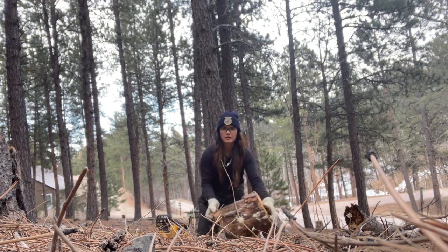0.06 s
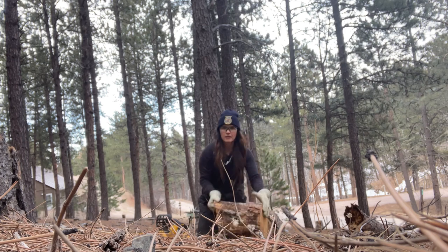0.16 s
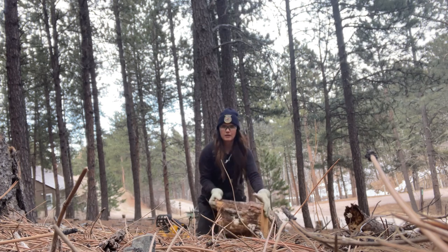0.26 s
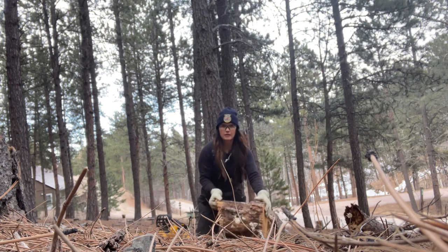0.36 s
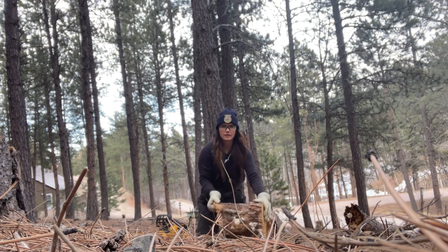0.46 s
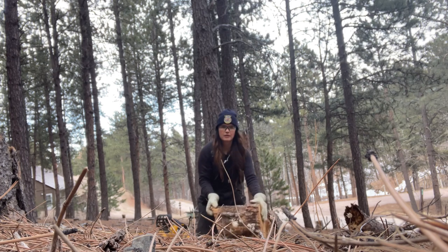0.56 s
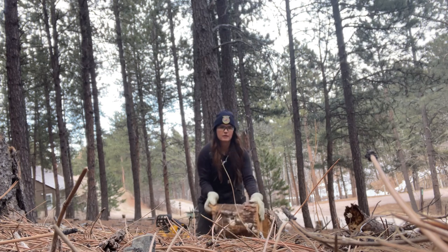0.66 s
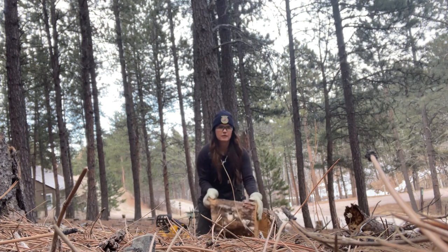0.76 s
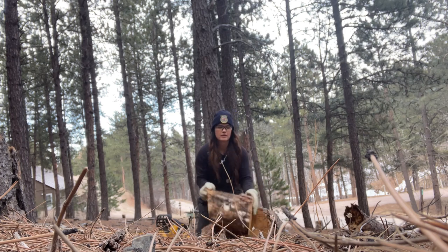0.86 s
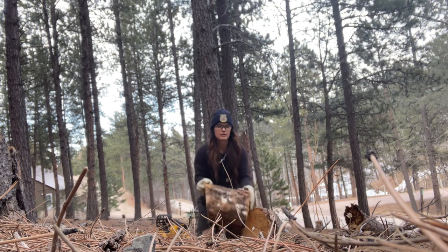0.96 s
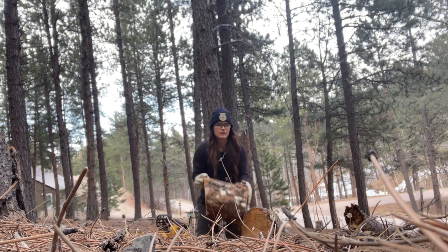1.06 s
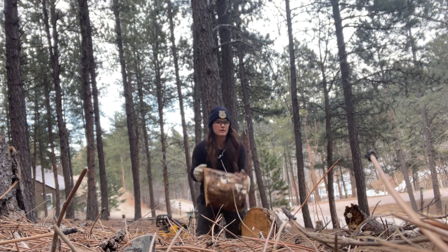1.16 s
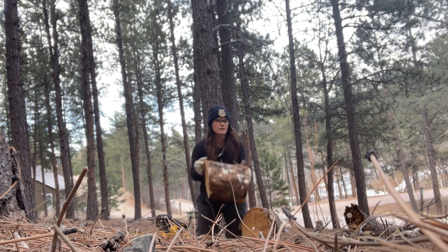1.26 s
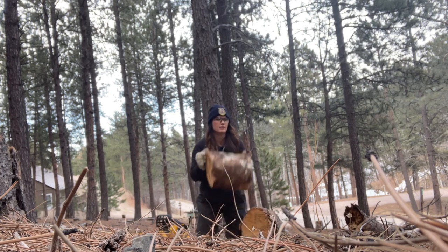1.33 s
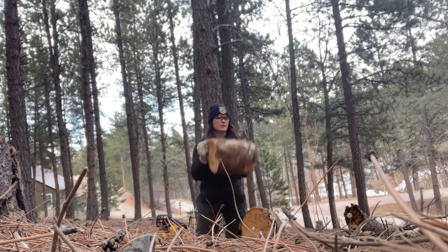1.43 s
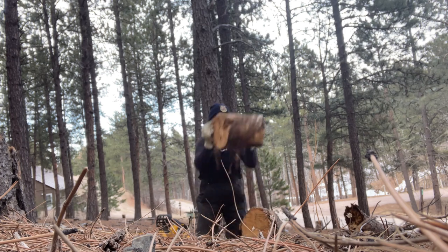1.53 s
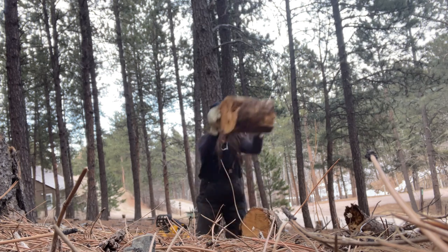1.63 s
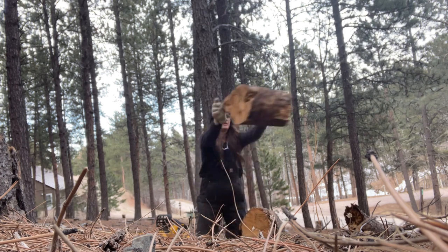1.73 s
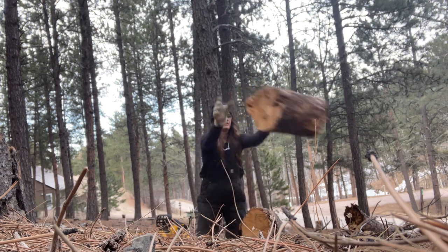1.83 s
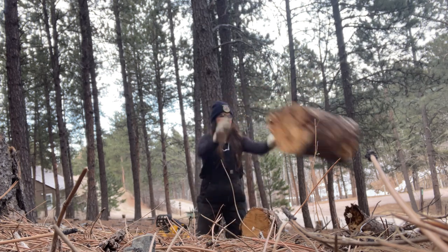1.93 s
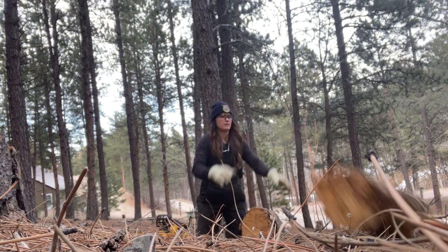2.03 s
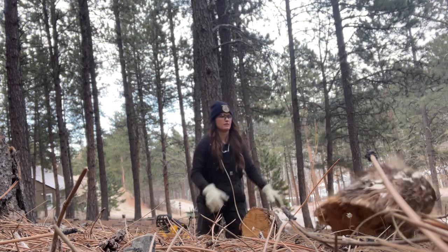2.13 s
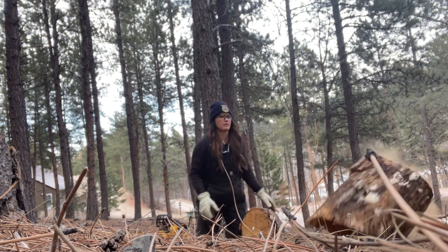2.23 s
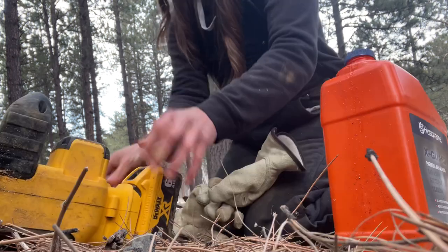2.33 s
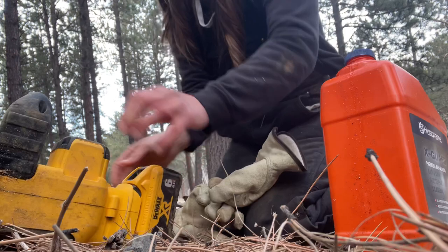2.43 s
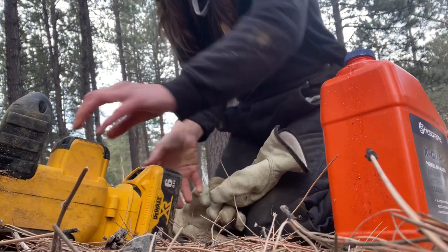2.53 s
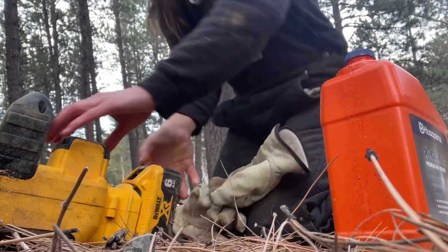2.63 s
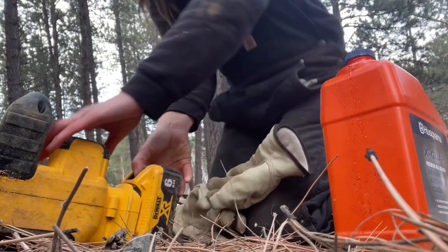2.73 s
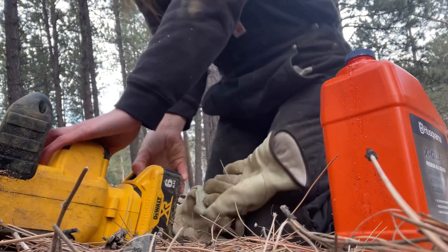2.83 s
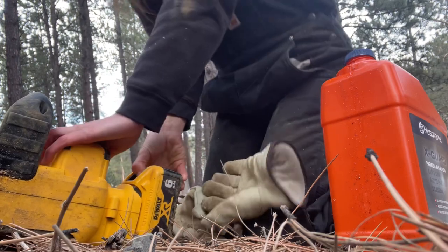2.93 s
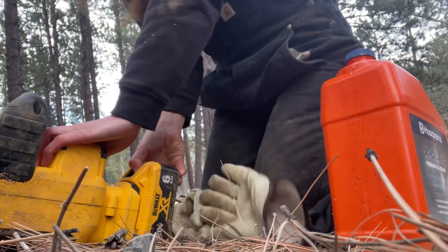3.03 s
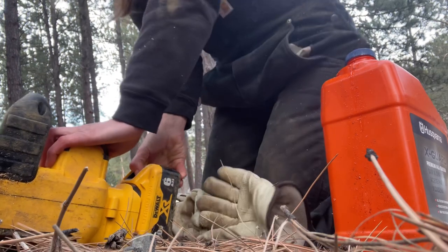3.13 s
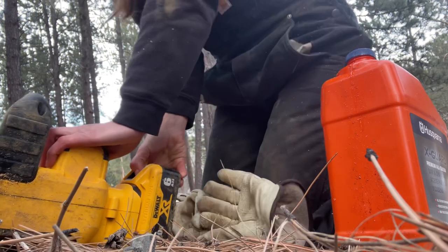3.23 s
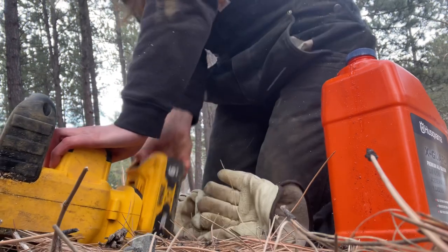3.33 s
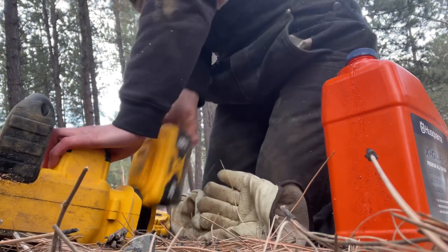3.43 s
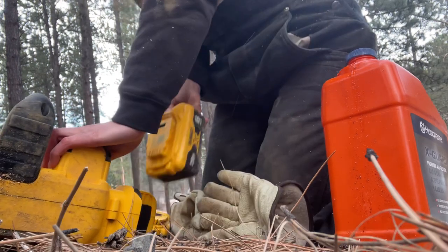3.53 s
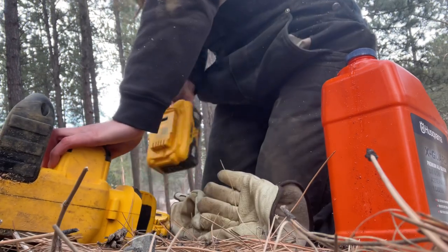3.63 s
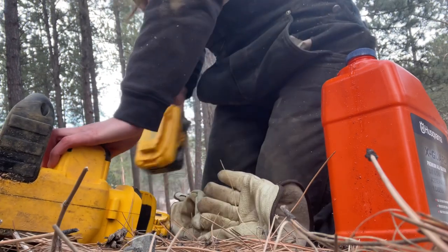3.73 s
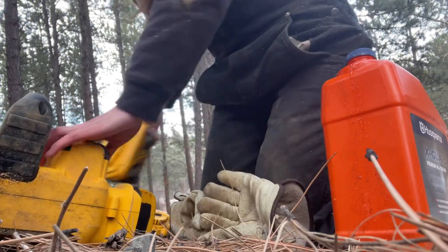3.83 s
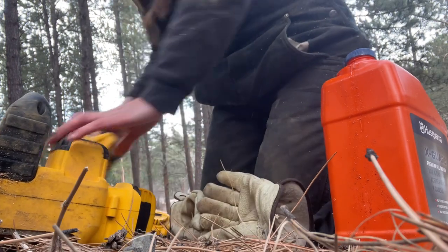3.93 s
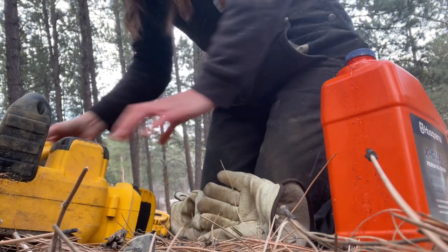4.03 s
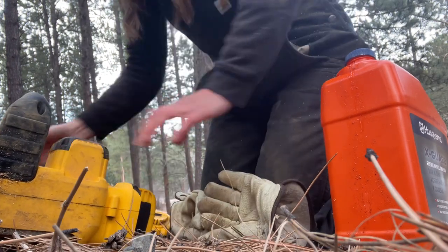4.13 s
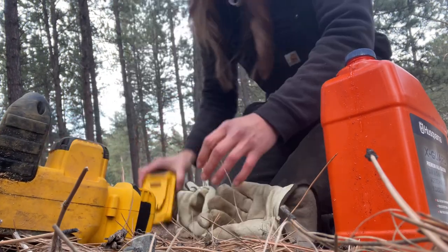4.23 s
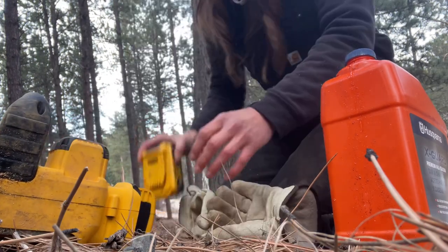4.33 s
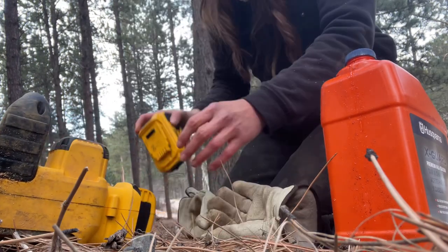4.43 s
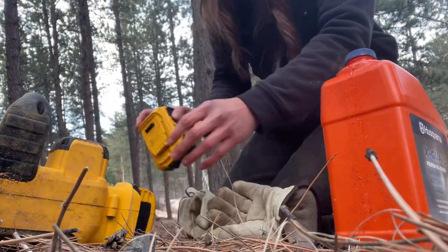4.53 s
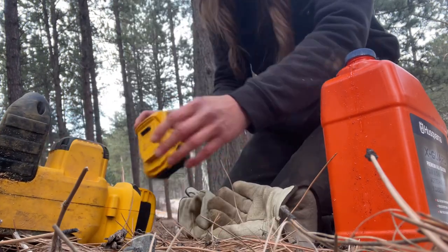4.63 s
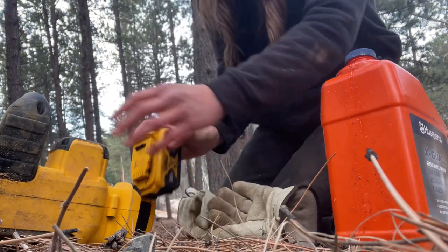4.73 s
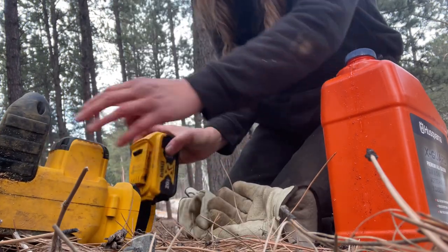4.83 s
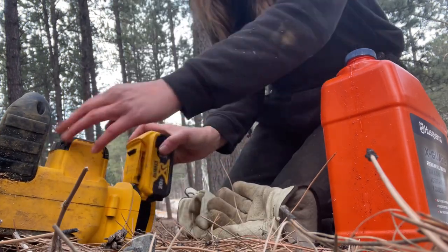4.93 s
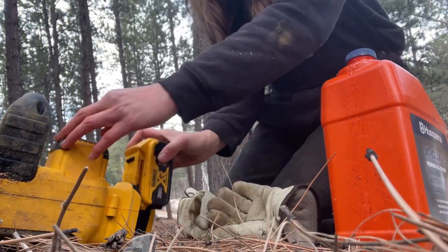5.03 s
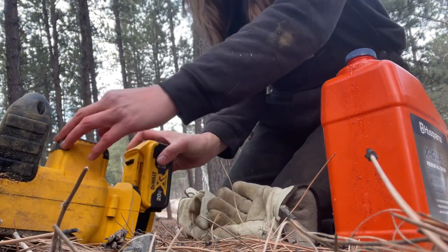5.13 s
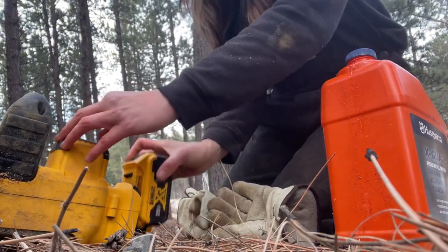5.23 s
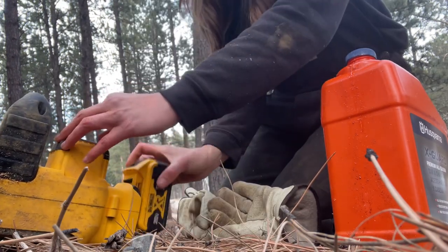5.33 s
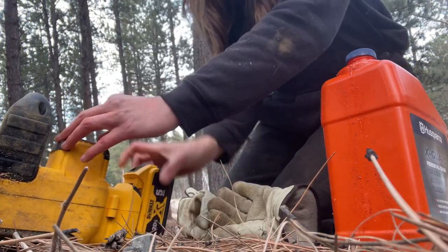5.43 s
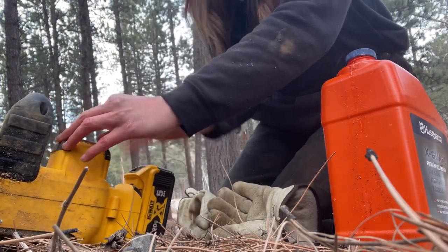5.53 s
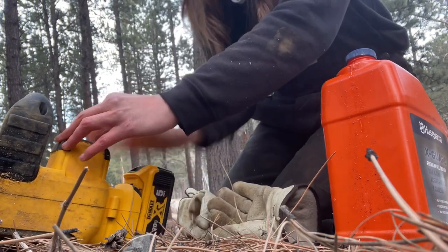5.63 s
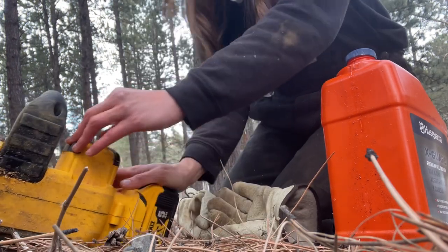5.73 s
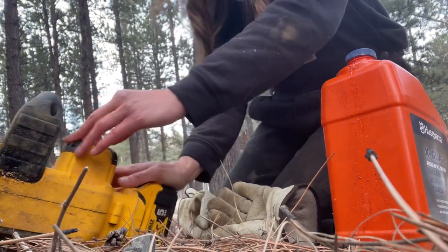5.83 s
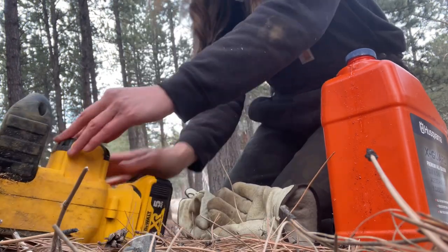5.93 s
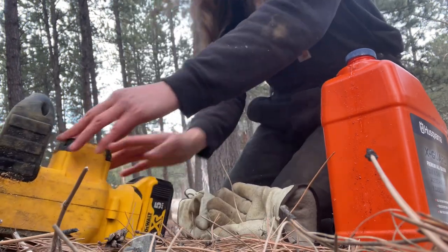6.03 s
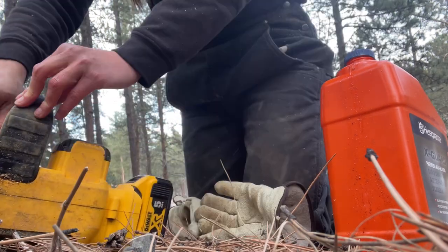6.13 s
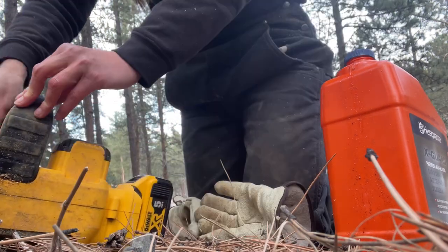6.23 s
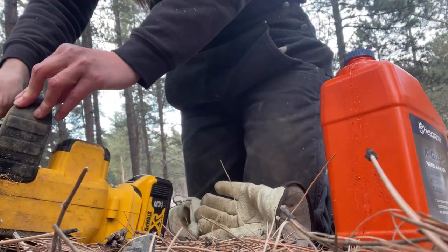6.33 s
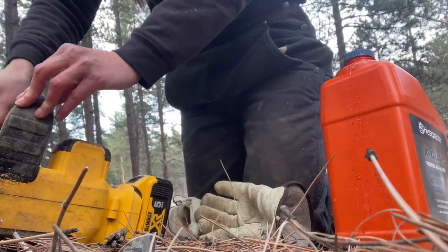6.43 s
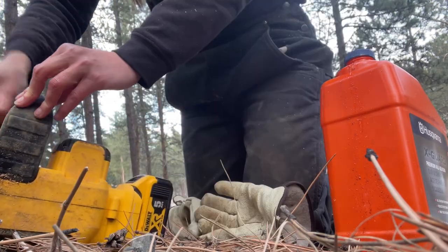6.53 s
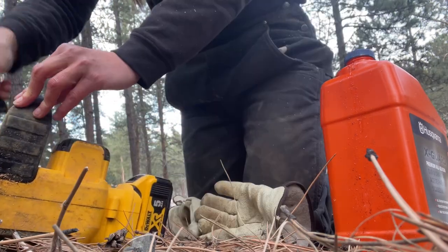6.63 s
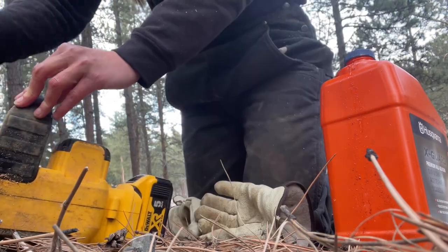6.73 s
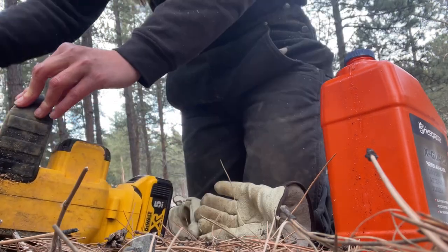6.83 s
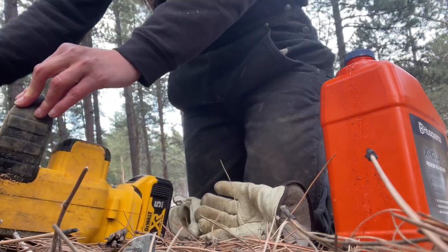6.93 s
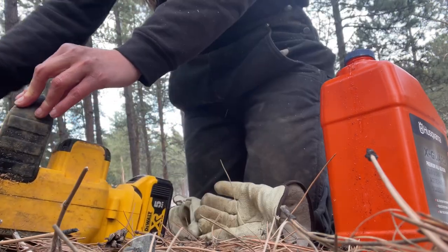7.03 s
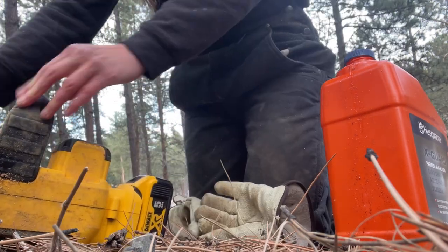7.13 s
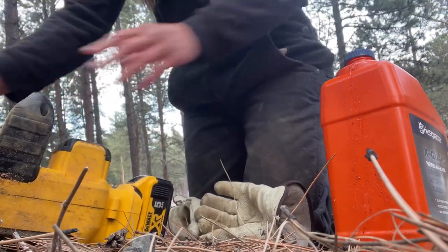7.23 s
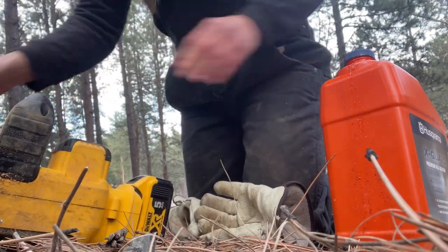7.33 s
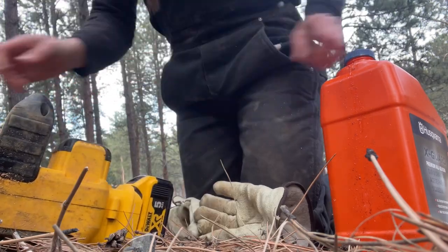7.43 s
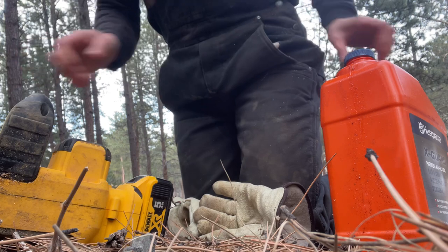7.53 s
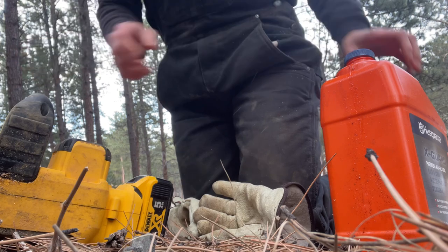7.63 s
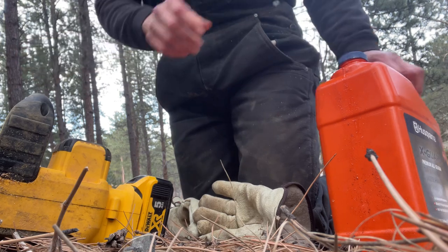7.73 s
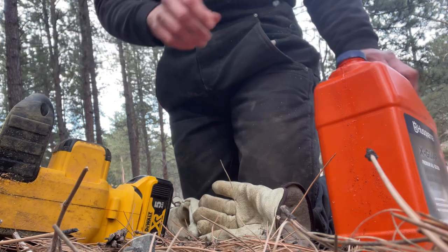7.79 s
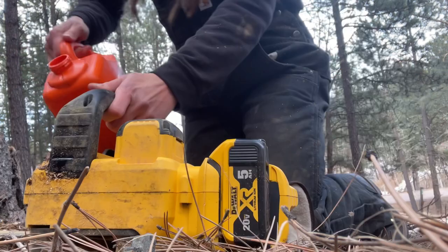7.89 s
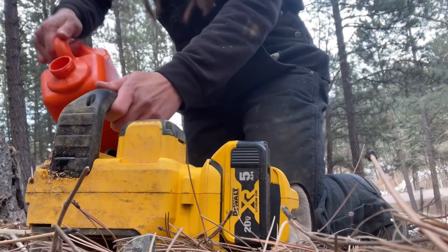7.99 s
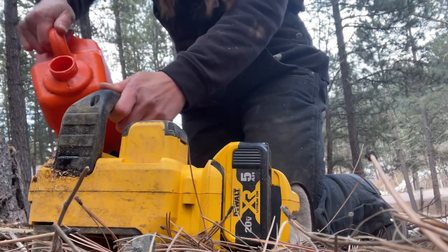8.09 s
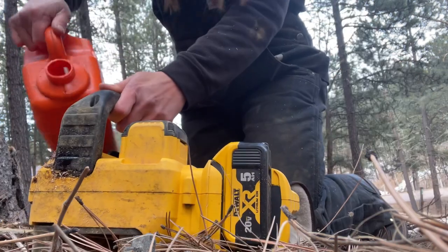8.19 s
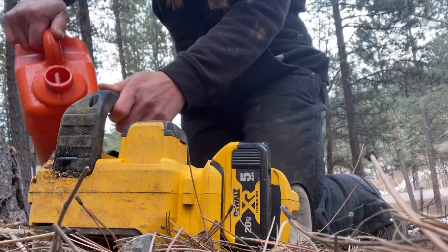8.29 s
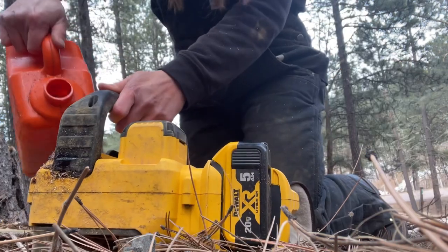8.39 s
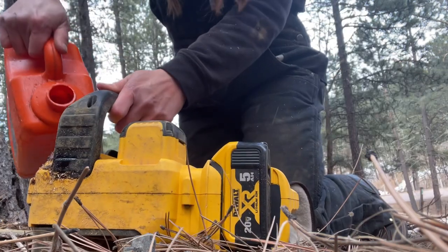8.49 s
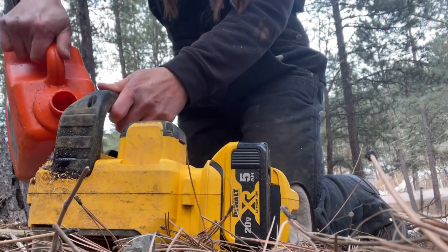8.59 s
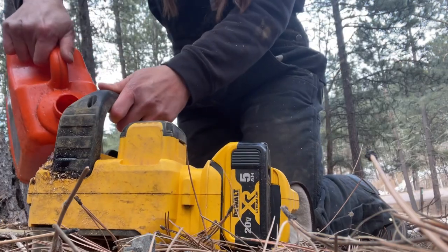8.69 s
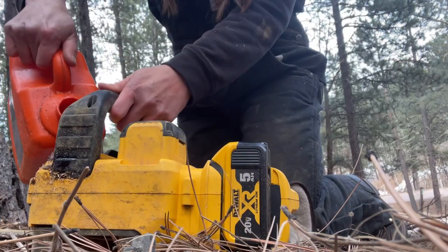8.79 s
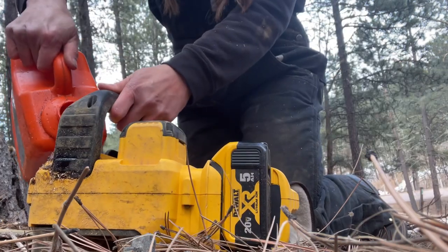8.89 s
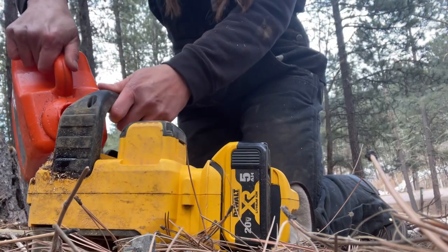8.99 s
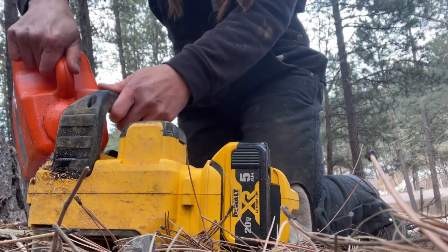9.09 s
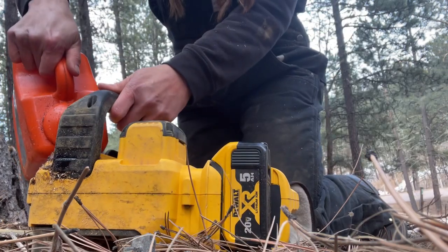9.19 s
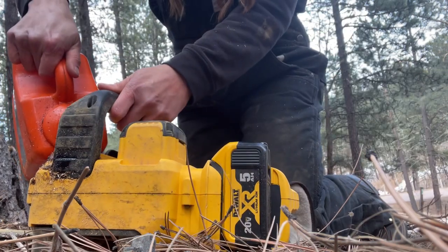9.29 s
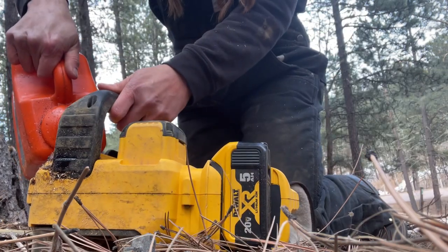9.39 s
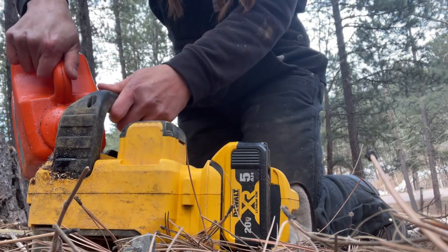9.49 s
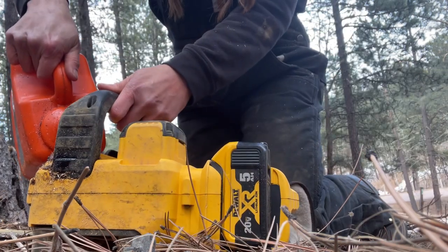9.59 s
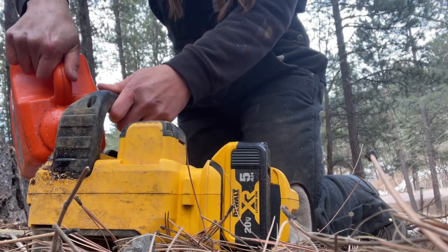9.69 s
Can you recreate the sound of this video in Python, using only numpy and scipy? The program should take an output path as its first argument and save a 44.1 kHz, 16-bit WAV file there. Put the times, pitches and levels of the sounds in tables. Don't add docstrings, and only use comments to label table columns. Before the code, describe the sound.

In a quiet pine wood with a faint hum and distant engine chug, gloves scuff a log's bark, then it lands close with a heavy woody thud and crackling needles. After short fades, a battery is tugged from a plastic saw, another rattles in and latches sharply, a cap ticks and is laid down, and a jug knocks hollowly. Close, dry stereo microphone near the ground.

```python
import sys
import numpy as np
from scipy import signal
from scipy.fft import rfft, irfft, next_fast_len
from scipy.io import wavfile

SR = 44100
rng = np.random.default_rng(int(sys.argv[2]) if len(sys.argv) > 2 else 0)


def voltage_ratio(decibels):
    exponent = np.asarray(decibels, float) / 20
    return 10 ** exponent


def store_pcm(level_fs):
    pcm = np.round(np.clip(level_fs, -1, 1) * 32767).astype(np.int16)
    wavfile.write(sys.argv[1], SR, np.atleast_2d(pcm).T)


N = 429956

# frequency in Hz, level in dB per Hz.
AIR_COLOUR = [(30, -13.5), (50, -0.5), (125, -12), (210, -16), (320, -7), (520, -22), (900, -37.5),
              (2300, -36.5), (3500, -47), (8000, -44.5), (16000, -56)]
# frequency in Hz, left-right likeness from -1 to 1.
AIR_LIKENESS = [(60, 0.3), (130, -0.0062), (300, 0.46), (640, 0.21), (3000, 0.79), (7000, -0.21),
                (12000, -0.095)]
# frequency in Hz, level in dB rms.
HUM_ORDERS = [(58, -72.5), (120.6, -75.5), (176.6, -80), (289.7, -70), (365, -74.5), (422, -84),
              (532.9, -81.5), (470, -82), (769.8, -76.5)]
# time in seconds, level in dB.
HUM_LEVEL = [(0, 4.5), (6, 5), (8, 3), (9.75, -1.5)]

# time in seconds, effort in dB, dryness in dB, left-right in dB.
LOG_WORK = [
    (0, -49.5, -9.5, -2),
    (.35, -58, -10, -1.5),
    (.65, -65.5, -13.5, -3.5),
    (.9, -63.5, -9.5, -2.5),
    (1.15, -82, -1.5, -3),
    (1.6, -76, -15, -2.5),
    (1.9, -87, -20.5, -1),
    (2.3, -72, -7, -3),
]
# time in seconds, effort in dB, dryness in dB, left-right in dB.
HAND_WORK = [(2.55, -67, -15.5, -5), (3.0, -67, -1, -3), (3.5, -50.5, -19.5, -0.5),
             (3.75, -66.5, -10.5, -3.5), (4.451, -68.5, -9, -3.5), (4.559, -71.5, -23.5, -5),
             (4.95, -74, -19.5, -6), (5.231, -64, -11, 0.2), (5.631, -70, -16.5, -1),
             (5.87, -66, -4.5, 0.7), (6.07, -66, -31, -2), (6.48, -80, -17, 0.5), (6.65, -69, -18, 0),
             (7.1, -79.5, -22, 0), (7.7, -69, -19, -8.5), (8.299, -71, -13.5, -2), (8.85, -91, -14.5, -6.5),
             (9.75, -85, -18, -5)]
# start in seconds, length in seconds, effort in dB, weight in dB,
# dryness in dB.
STROKES = [(.14, 0.13, -43.5, 2, -14.5), (.468, 0.14, -62, 6.5, -7), (.745, 0.037, -66.5, 12, -4),
           (.971, 0.087, -60.5, 1.5, -7), (1.128, 0.056, -88, 24, 6), (1.692, 0.12, -55.5, -1, -13.5),
           (2.102, 0.041, -72, 11, 7.5), (2.678, 0.48, -60, 1, -6.5), (3.05, 0.2, -54.5, -9, -14.5),
           (3.34, .17, -47, -3.5, -6.5), (3.939, .11, -63, -5, -9.5), (4.254, 0.13, -61.5, 0.3, -3.5),
           (5.253, 0.097, -44.5, 6.5, -19), (5.494, 0.092, -54, 1, -11.5), (5.735, 0.036, -17, -13, -16.5),
           (5.893, 0.16, -58.5, -13.5, -10.5), (6.56, 0.018, -56, 3.5, -12.5),
           (6.578, 0.019, -51.5, -4, 3.5), (6.688, 0.052, -61, -23.5, -38),
           (6.832, 0.07, -58.5, -10.5, -17), (6.949, 0.039, -64, -4, -27.5), (7.749, 0.079, -84, 5.5, 9),
           (8.04, 0.22, -62.5, -5, -9.5)]
# start in seconds, time to fall 30 dB in seconds, effort in dB,
# weight in dB, dryness in dB.
SETTLING = [
    (2.155, 0.19, -46.5, 12.5, -2),
    (2.307, 0.0332, -54, 26, 4),
    (5.02, 0.059, -40.5, 8, -27),
    (5.13, 0.038, -29, -2.5, -44),
    (5.36, 0.27, -53, -10, -10.5),
    (5.773, 0.13, -42, -21.5, -32),
    (7.204, 0.044, -38, -25.5, -16),
    (7.285, 0.5, -59, -5, -22),
    (8.0, 0.09, -39.5, -2, -12),
    (8.03, 0.2, -69, -13, 3.5),
]
# frequency in Hz, level in dB per Hz.
RUB_COLOUR = [(59, -30), (100, -6), (193, -8.5), (283, -3.5), (322, -7), (358, -10.5), (2320, -25),
              (3120, -34), (3940, -27.5), (7450, -35.5), (12700, -27), (16000, -43.5)]
# frequency in Hz, left-right likeness from -1 to 1.
RUB_LIKENESS = [(60, 0.96), (300, 0.6), (1000, 0.75), (3000, -0.49), (7000, 0.21), (10000, 0.8),
                (15000, 0.92)]
# time in seconds, share that sounds in the shell.
ON_SHELL = [(4.9, 0), (5, 1), (5.6, 1), (5.7, 0)]

# first firing in seconds, number of firings, firings per second.
CHUGS = [
    (.045, 30, 12.64),
    (2.462, 22, 12.62),
    (4.233, 24, 12.6),
    (6.191, 12, 11.9),
]
# time in seconds, peak in dB.
ENGINE_LEVEL = [(0, -45.5), (2, -49), (4, -48), (6, -51), (6.75, -49), (6.9, -60.5), (7.2, -60.5)]

# time in seconds, peak in dB, ring in Hz, crack in dB. First the bark of the log:
BARK = [
    (.077, -40, 760, -45),
    (.181, -31.5, 710, -51),
    (.203, -31, 790, -46),
    (.657, -50, 1560, -81),
    (.993, -48.5, 616, -55),
    (1.035, -41.5, 1910, -59),
    (1.793, -64, 1170, -51),
    (2.152, -10.5, 395.5, -25),
    (2.195, -17.5, 416, -38.5),
]
BATTERY_OUT = [
    (2.811, -33, 2200, -57),
    (2.857, -32.5, 606, -50),
    (3.056, -25.5, 880, -72),
    (3.147, -38, 636, -79),
    (3.19, -44.5, 790, -75),
    (3.37, -26.5, 383, -42),
    (3.411, -27, 900, -52),
    (3.461, -23, 616, -61),
    (3.497, -19.5, 754, -44),
]
BATTERY_IN = [(4.861, -52, 1160, -89), (5.022, -29.5, 627, -48.5), (5.13, -43, 465, -74),
              (5.143, -14, 460, -33), (5.168, -33, 440, -80), (5.259, -22.5, 652, -57),
              (5.286, -27.5, 410, -52), (5.339, -27.5, 434, -70), (5.51, -36, 613, -55),
              (5.528, -36, 880, -52.5), (5.737, -14, 571.3, -19.5), (5.748, -9.5, 993, -23),
              (5.758, -10.5, 423.2, -19), (5.816, -31.5, 1020, -50), (6.1, -57, 1240, -79.5)]
CAP = [
    (6.372, -56, 697, -84.5),
    (6.538, -50, 1590, -40.5),
    (6.58, -51, 417, -49),
    (6.697, -52.5, 1200, -86),
    (6.733, -54.5, 1110, -83.5),
    (6.786, -57.5, 1270, -83.5),
    (6.858, -40.5, 1228, -59.5),
    (6.879, -43.5, 557, -60),
    (6.96, -48.5, 1240, -68),
]
CAP_DOWN = [
    (7.193, -48.5, 896, -58),
    (7.21, -28, 1100, -62),
    (7.228, -37, 1340, -63),
    (7.278, -38.5, 1000, -77),
    (7.703, -54.5, 896, -71.5),
]
JUG = [
    (8.003, -32, 860, -46),
    (8.0, -30.5, 2465, -40.5),
    (8.201, -41.5, 980, -64),
    (8.315, -44, 935, -60),
    (8.532, -55, 957, -74.5),
    (8.687, -55.5, 1056, -70.5),
]
# knock table, ring t60 at 600 Hz in seconds, tick in dB for a crack of -50 dB,
# share of the crack's swing in the tick.
OBJECTS = [
    (BARK, 0.043, -56, 1),
    (BATTERY_OUT, 0.026, -56, 0.159),
    (BATTERY_IN, 0.035, -56, 0.89),
    (CAP, 0.082, -55.5, 1),
    (CAP_DOWN, 0.023, -55, 0.65),
    (JUG, 0.03, -47, 0.87),
]
# frequency in Hz, left-right in dB.
LOG_SIDE = [(60, 4), (300, 0), (1000, -6), (3000, -2.5), (8000, -0.5)]
# frequency in Hz, left-right in dB.
SAW_SIDE = [(80, 4), (400, 4.5), (1000, 3), (2500, -2.5), (6000, 0)]
# time in seconds, samples the left side lags.
LEFT_LAG = [(0, -3.5), (1.9, 2), (2.1, 11), (2.4, 12), (2.5, -3), (6, -1), (6.5, -4.5), (9.75, -3)]

# time in seconds, peak in dB.
CATCHES = [(.134, -39), (.154, -37), (.27, -36.5), (.563, -47), (.576, -52), (.767, -49), (.942, -51),
           (1.123, -55), (2.155, -16.5), (5.654, -55), (5.7365, -8), (5.7485, -1), (5.759, -8),
           (5.804, -43), (5.8165, -25.5), (6.617, -49), (8.107, -42), (8.12, -45.5), (8.134, -43),
           (8.15, -50), (8.209, -47), (8.233, -46), (8.246, -50), (8.261, -52), (3.348, -42), (8.487, -60),
           (8.566, -58)]
# time in seconds, peak in dB.
SNAPS = [(0.471, -38.5), (0.7524, -46), (2.2184, -36.5), (2.308, -50), (2.7009, -39), (2.742, -38),
         (2.761, -34), (2.793, -39.5), (2.833, -33.5), (2.8423, -38), (2.8874, -35.5), (2.8984, -38.5),
         (2.942, -36), (3.0073, -23.5), (3.072, -37), (3.0899, -41), (3.108, -38), (3.2279, -46),
         (4.313, -34.5), (5.499, -57), (5.9905, -51), (7.7659, -46), (7.7897, -39.5), (8.067, -38),
         (8.1795, -43.5), (8.6862, -50), (8.761, -52), (8.87, -65), (9.089, -68), (9.689, -64)]
# time in seconds, peak in dB, body in Hz, t60 in seconds.
THUDS = [(0.265, -30, 200, 0.044), (0.29, -38, 80, 0.033), (0.569, -40.5, 247, 0.039),
         (2.152, -6.5, 224, 0.03), (2.168, -12.5, 82.6, 0.1), (2.196, -9, 265, 0.012),
         (2.225, -36, 83, 0.088), (2.311, -22, 157, 0.02), (3.058, -27.5, 330, 0.032),
         (5.764, -17.5, 247, 0.032), (6.578, -38.5, 232, 0.028), (6.607, -44, 101.6, 0.043),
         (7.773, -41, 222.4, 0.052), (7.821, -51, 131.8, 0.12), (8.001, -24, 226.4, 0.032),
         (8.029, -31, 205, 0.03), (9.539, -53, 241, 0.098), (2.154, -3.5, 306, 0.019),
         (7.214, -40, 573, 0.14), (7.282, -45, 590, 0.027)]
# start in seconds, length in seconds, level in dB rms, pitch in Hz.
RAILS = [(3.436, .075, -49.5, 5270), (3.44, 0.07, -65, 2400), (5.28, 0.052, -59, 5300),
         (5.719, 0.017, -49, 2200), (7.295, 0.085, -75, 3080), (7.328, 0.06, -68.5, 2000),
         (2.15, 0.056, -51, 12800), (5.064, 0.039, -67.5, 4800), (5.056, 0.047, -61, 990),
         (6.845, 0.073, -79, 12600), (7.758, .04, -69, 4350), (7.999, .05, -59.5, 6500),
         (5.722, 0.018, -42, 4300), (5.723, 0.0096, -49, 5730), (5.724, 0.014, -52, 3200),
         (7.965, 0.038, -72, 11000)]
# time in seconds, peak in dB, pitch in Hz, t60 in seconds.
PINGS = [(2.154, -26, 3950, 0.012), (2.191, -42, 3500, 0.078), (2.307, -43, 3580, 0.022),
         (2.309, -47.5, 4640, 0.017), (2.721, -57.5, 1134, 0.012), (2.812, -33, 2660, 0.0041),
         (2.811, -42, 3470, 0.011), (2.858, -29, 970, 0.0078), (2.858, -49, 2300, 0.011),
         (3.368, -35, 1960, 0.011), (3.371, -27, 2080, 0.01), (3.372, -36, 2960, 0.0068),
         (3.457, -18.5, 830, 0.0074), (3.497, -31, 1000, 0.019), (3.503, -27.5, 870, 0.017),
         (5.021, -39, 1696, .012), (5.143, -25, 2350, 0.025), (5.144, -22, 1040, 0.027),
         (5.144, -28, 2880, 0.011), (5.294, -36, 1940, 0.013), (5.323, -48, 1670, .015),
         (5.322, -48, 5260, .015), (5.457, -50, 1310, .04), (5.735, -18, 2330, 0.0085),
         (5.749, -7, 2600, 0.005), (5.757, -4.5, 2060, 0.0063), (5.765, -13.5, 370, 0.031),
         (5.779, -35, 2200, 0.026), (7.204, -39, 968, 0.019), (7.21, -26.5, 1530, 0.0098),
         (7.208, -37, 2910, 0.014), (7.226, -39, 1650, 0.017), (7.276, -50, 2240, .015),
         (7.348, -59, 1914, 0.038), (7.368, -53, 900, 0.028), (8.0, -26, 2453, .01),
         (7.999, -24, 230.5, 0.08), (8.005, -35, 854, 0.1), (8.013, -36, 2270, 0.025),
         (8.029, -32.5, 220, 0.11), (8.869, -66, 2610, 0.014), (9.088, -63, 2684, 0.014),
         (9.688, -64, 1215, .015),
         (3.007, -41, 1790, 0.0049), (3.055, -41, 1320, 0.0074), (3.149, -46, 2010, .01),
         (3.19, -39, 1460, 0.0079), (5.134, -38, 523, .03), (5.176, -32, 606, 0.027),
         (6.538, -33.5, 6120, 0.013), (6.538, -35.5, 9970, .012), (6.538, -39.5, 14360, 0.013),
         (6.545, -37, 6050, 0.011), (6.545, -41.5, 2850, 0.013), (6.545, -41, 14100, 0.0085),
         (6.718, -52, 1297, .02), (6.845, -47, 1390, 0.024), (6.857, -48.5, 6230, 0.019),
         (6.857, -47.5, 3080, 0.0094), (6.88, -44, 1270, .03), (6.88, -38, 4910, 0.011),
         (6.88, -46, 2240, 0.015), (6.955, -52.5, 1260, 0.021), (7.209, -36, 4700, 0.0085),
         (8.001, -34, 3700, 0.0085), (8.0, -21, 6530, 0.0071), (8.183, -60, 4460, 0.011),
         (8.232, -54.5, 1100, 0.014), (8.316, -46, 2000, .012), (8.316, -60, 5500, 0.0084),
         (8.869, -56.5, 4990, 0.0077), (8.869, -56.5, 6400, .008), (9.088, -60.5, 4980, .008),
         (9.088, -62.5, 3400, 0.0074), (2.153, -21, 12600, .012), (2.152, -47, 1980, 0.011),
         (3.375, -38.5, 68, 0.12), (5.136, -42.5, 136, 0.17), (5.146, -23.5, 397, 0.082),
         (5.33, -41.5, 132, 0.092), (7.992, -35.5, 65.4, 0.16), (8.004, -37, 430, 0.044),
         (8.0, -33, 10870, 0.006), (9.687, -65, 2994, 0.0073)]
# time in seconds, fade-out in seconds, fade-in in seconds.
JOINS = [
    (2.41, 0.076, 0.15),
    (4.179, 0.12, 0.14),
    (6.136, 0.14, 0.187),
    (7.863, 0.015, 0.13),
]


def in_time(rows):
    s, *columns = np.transpose(rows)
    return [np.interp(np.arange(N) / SR, s, c) for c in columns]


def at_hz(points, hz):
    return np.interp(np.log(hz), np.log(np.array(points)[:, 0]), np.array(points)[:, 1])


def rms_one(x):
    return x / np.sqrt(np.mean(x ** 2) + 1e-20)


def band(x, low_hz, high_hz):
    return signal.sosfilt(signal.butter(2, [low_hz, min(high_hz, .45 * SR)], "band", fs=SR, output="sos"), x)


def drift(rate):
    r = np.exp(-80 * np.pi * rate / SR)
    slow = signal.lfilter([1], [1, -2 * r, r * r], rng.standard_normal(N // 40 + 2002))[2000:]
    return np.interp(np.arange(N) / 40, np.arange(len(slow)), rms_one(slow))


def ring(x, hz, t60):
    r = voltage_ratio(-60 / (max(t60, .004) * SR))
    w = 2 * np.pi * hz / SR
    return signal.lfilter([0, np.sin(w)], [1, -2 * r * np.cos(w), r * r], x + 1e-18)


def coloured(source, spectrum, likeness, low_hz, high_hz, patchy_db):
    edges = np.geomspace(low_hz, high_hz, 2 + int(2 * np.log2(high_hz / low_hz)))
    out = 0
    for k, (low, high) in enumerate(zip(edges, edges[1:])):
        mid, side = band(source[k % 2], low, high)
        hz = np.sqrt(low * high)
        alike = np.clip(at_hz(likeness, hz), -1, 1)
        gain = voltage_ratio(at_hz(spectrum, hz) + patchy_db * drift(31.0))
        out = out + gain * (np.sqrt(1 + alike) * mid + np.sqrt(1 - alike) * side * [[1], [-1]])
    return rms_one(out)


def side_db(s, hz):
    saw_from_s = 2.41
    return at_hz(LOG_SIDE if s < saw_from_s else SAW_SIDE, hz)


def place(out, s, sound, pan_db, lag):
    for side, (sign, shift) in enumerate([(1, max(lag, 0)), (-0.73, max(-lag, 0))]):
        i = round(s * SR) + shift
        out[side, i:i + len(sound)] += voltage_ratio(sign * pan_db / 2) * sound[:N - i]
    return out


def air():
    noise = rng.standard_normal((2, 2, N))
    level_db = -63 + 0.6 * drift(1.6)
    return voltage_ratio(level_db) * coloured(noise, AIR_COLOUR, AIR_LIKENESS, 32, 16000, patchy_db=3.0)


def generator():
    t = np.arange(N) / SR
    lines = 0
    for hz, db in HUM_ORDERS:
        level = voltage_ratio(db + 2.5 + 2.5 * drift(3.1))
        lines = lines + level * np.sin(2 * np.pi * hz * t + 0.6 * drift(1.3))
    return lines * voltage_ratio(in_time(HUM_LEVEL)[0])


def layers(effort_db, weight_db, dry_db):
    crackle_db, fine_db = 1, -1
    return voltage_ratio(effort_db + np.array([weight_db, 0 * weight_db, dry_db + crackle_db, dry_db + fine_db]))


def strokes():
    power, t = np.zeros((4, N)), np.arange(SR // 2) / SR
    for table, dies in ((STROKES, False), (SETTLING, True)):
        for s, length, *stroke_db in table:
            if dies:
                shape = np.minimum(t * 120, 1) * voltage_ratio(-30 * t / length)
            else:
                swell, stop = t / (0.27 * length), (length - t) / (0.11 * length) + .5
                shape = np.clip(np.minimum(swell, stop), 0, 1)
            i = round(s * SR)
            power[:, i:i + len(t)] += (layers(*stroke_db)[:, None] * shape) ** 2
    return power


def rustle():
    effort_db, dry_db, pan_db = in_time(LOG_WORK + HAND_WORK)
    rub_db, rub_follows = -62, 0.7
    weight_db = (1 - rub_follows) * (rub_db + 5 - effort_db)
    steady = layers(effort_db, weight_db, dry_db)
    low, mid, crackle, fine = np.sqrt(steady ** 2 + strokes())

    clump = voltage_ratio(3.0 * drift(17.0) + 3.8 * drift(54))
    sizes = voltage_ratio(4.6 * np.minimum(rng.exponential(1, N), 4.5)) * rng.choice([-1, 1], N)
    snaps = rms_one(sizes * (rng.random(N) < 350 * clump / SR))
    rub = rng.standard_normal((2, 2, N)) * clump ** 0.36
    source = rub + 0.55 * snaps * np.array([[1], [.4]])

    shell = in_time(ON_SHELL)[0]
    ground = coloured(source, RUB_COLOUR, RUB_LIKENESS, 140, 550, patchy_db=2.0)
    hollow = rms_one(band(ground, 346, 534))
    out = low * ((1 - shell) * ground + shell * hollow)
    out += mid * coloured(source, RUB_COLOUR, RUB_LIKENESS, 550, 3600, patchy_db=3.0)
    out += crackle * coloured(source, RUB_COLOUR, RUB_LIKENESS, 2200, 7000, patchy_db=4.5)
    out += fine * coloured(source, RUB_COLOUR, RUB_LIKENESS, 7400, 15800, patchy_db=-3.0)
    return out * voltage_ratio(pan_db / 2 * np.array([[1], [-1]]))


def engine():
    when = np.concatenate([s + np.arange(count) / rate for s, count, rate in CHUGS])
    stop_firings, stop_late_s = 4, .0075
    when[-stop_firings:] += stop_late_s * np.arange(1, stop_firings + 1) ** 2
    chance = rng.standard_normal((len(when), 2))
    at = ((when - .014 + 0.0013 * chance[:, 0]) * SR).astype(int)
    clicks = np.zeros(N)
    clicks[at] = voltage_ratio(in_time(ENGINE_LEVEL)[0][at] + 0.52 * chance[:, 1])
    click = np.eye(1, 4000)[0]
    puff = band(ring(ring(click, 75, 0.048), 105, 0.049), 52, 160)
    return signal.fftconvolve(clicks, puff)[:N] / np.abs(puff).max()


def knocks():
    out, t = np.zeros((2, N)), np.arange(5000) / SR
    lag = in_time(LEFT_LAG)[0]
    modes = [(1, 3.5, 0), (1.6, -3, 1), (2.4, -12, 1)]
    rise = 1 - np.exp(-t / 0.0019)
    rows = [(*row, *rule) for table, *rule in OBJECTS for row in table]
    for s, peak_db, hz, crack_db, ring_s, tick_db, follows in rows:
        t60 = ring_s * np.sqrt(600 / hz)
        tick_db = tick_db + follows * (crack_db + 50)
        noise, spread = rng.standard_normal((3, len(t))), rng.uniform(-0.79, 1, 3)

        touch = 2.5 * np.exp(-((t - .0006) / 0.00016) ** 2)
        contact = noise[0] * rise * voltage_ratio(-60 * t / 0.012) + touch
        shell = 0
        for (ratio, db, detuned), u in zip(modes, spread):
            mode_hz = hz * ratio * (1 + 0.19 * u * detuned)
            shell = shell + voltage_ratio(db) * ring(contact, mode_hz, t60 / ratio ** .5)
        slap = 0.38 * band(contact, 1000, 2900)
        shell = shell / np.abs(shell).max() + slap
        shell = band(band(shell, 380, 6000), 300, 6700)

        dying = rise * (voltage_ratio(-60 * t / .012) + voltage_ratio(-32.0) * voltage_ratio(-60 * t / 0.067))
        crack = voltage_ratio(crack_db + 19) * band(noise[1] * dying, 1800, 5500)
        tick = voltage_ratio(tick_db + 16.5) * band(noise[2] * dying, 9800, 9900)
        body = voltage_ratio(peak_db) * shell / np.abs(shell).max() + crack
        out = place(out, s + 0.00037, body, side_db(s, hz), round(lag[round(s * SR)]))
        out = place(out, s - .0005, tick, 0, 0)
    return out


def needles(breaks, top_hz):
    out, t = np.zeros((2, N)), np.arange(600) / SR
    for s, peak_db in breaks:
        noise = rng.standard_normal((2, len(t))) * voltage_ratio(-t * SR / 6)
        tilt = rng.uniform(-1, 1, 2)
        body, top = band(noise[0], 1600, 9300), band(noise[1], 0.66 * top_hz, top_hz)
        body *= voltage_ratio(peak_db - 7.0 + 1.7 * tilt[0]) / np.abs(body).max()
        top *= voltage_ratio(peak_db - 6.0) / np.abs(top).max()
        out = place(out, s, body, -0.89, round(3 * tilt[1]))
        out = place(out, s, top, 0, 0)
    return out


def thuds():
    out, t = np.zeros((2, N)), np.arange(9000) / SR
    lag = in_time(LEFT_LAG)[0]
    for s, peak_db, hz, t60 in THUDS:
        push = np.exp(-((t - .004) * hz / 0.033) ** 2)
        puff = band(rng.standard_normal(len(t)) * voltage_ratio(-60 * t / (4.3 * t60)), .5 * hz, 2.2 * hz)
        mode = band(ring(push, hz, t60), 0.53 * hz, 2.1 * hz)
        sound = mode / np.abs(mode).max() + 1.1 * puff
        out = place(out, s - .002, voltage_ratio(peak_db) * sound, side_db(s, hz), round(2 * lag[round(s * SR)]))
    return out


def rails():
    out, t = np.zeros((2, N)), np.arange(6000) / SR
    half_width = 0.26 / 2
    for s, length, db, hz in RAILS:
        noise = rng.standard_normal((2, len(t)))
        flutter = voltage_ratio(2.8 * rms_one(band(noise[1], 30, 200)))
        hiss = rms_one(band(noise[0] * flutter, hz * (1 - half_width), hz * (1 + half_width)))
        fade = np.clip(np.minimum(t, length - t) / 0.0058, 0, 1)
        out = place(out, s, voltage_ratio(db) * hiss * fade, 0, 3)
    return out


def pings():
    out, t = np.zeros((2, N)), np.arange(9000) / SR
    lag = in_time(LEFT_LAG)[0]
    for s, peak_db, hz, t60 in PINGS:
        push = np.exp(-((t * hz - 1) / 0.31) ** 2) * np.sin(2 * np.pi * hz * t)
        sound = ring(push, hz, t60)
        sound = voltage_ratio(peak_db) * sound / np.abs(sound).max()
        out = place(out, s, sound, side_db(s, hz), round(lag[round(s * SR)]))
    return out


def trunks(x):
    out = np.zeros_like(x)
    for k, lag_s in enumerate(rng.uniform(.004, 0.057, 14)):
        lag = int(lag_s * SR)
        out[k % 2, lag:] += voltage_ratio(-250 * lag_s) * (-1) ** (k // 2) * x[(k // 2) % 2, :-lag]
    return band(out, 130, 5000)


def from_afar(x):
    size = next_fast_len(N)
    hz = np.arange(size // 2 + 1) * SR / size
    late = 27 * np.interp(hz, [80, 160, 1200, 2000], [.1, 1, 1, 0])
    left = irfft(rfft(x[0], size) * np.exp(-2j * np.pi * hz * late / SR), size)[:N]
    return np.array([left, x[1]])


def scene():
    machines = (engine() + generator()) * voltage_ratio(np.array([[.8], [-.8]]))
    far = from_afar(machines + air())
    hits = knocks() + thuds() + needles(SNAPS, top_hz=14760) + pings()
    echoes = voltage_ratio(-26.5) * trunks(hits)
    return hits + echoes + rustle() + far + rails() + needles(CATCHES, top_hz=13200)


def roll_off(x):
    return signal.sosfilt(signal.butter(12, 16350, fs=SR, output="sos"), x)


def record(dry):
    t, gain = np.arange(N) / SR, np.ones(N)
    for s, out_s, in_s in JOINS:
        gain *= np.clip(np.maximum((s - t) / out_s, (t - s) / in_s), .003, 1) ** 1.5
    x = signal.sosfilt(signal.butter(4, 46, "high", fs=SR, output="sos"), dry)
    x = signal.sosfilt(signal.butter(12, 15200, fs=SR, output="sos"), x)
    x = x - 0.34 * band(x, 6900, 8300)
    mix = np.clip(x * gain, -.98, .98)
    return roll_off(mix)


dry = scene()
out = record(dry)
store_pcm(out)
```